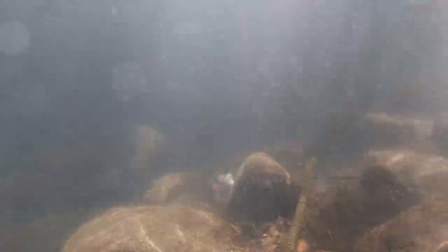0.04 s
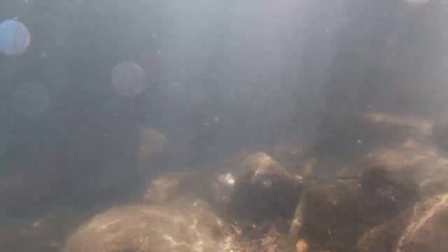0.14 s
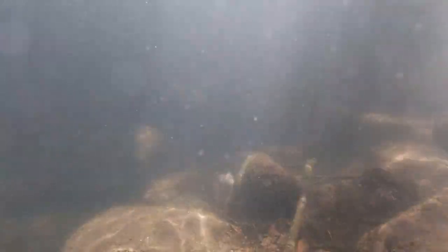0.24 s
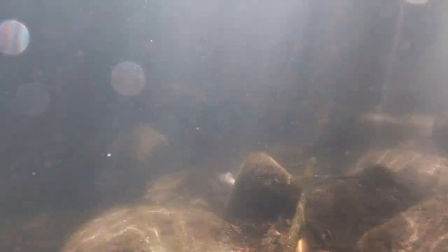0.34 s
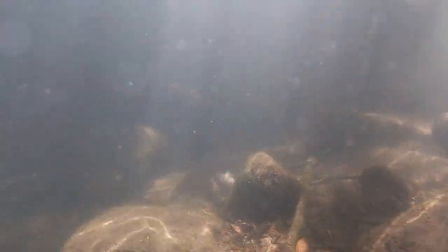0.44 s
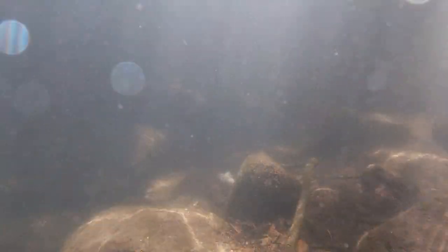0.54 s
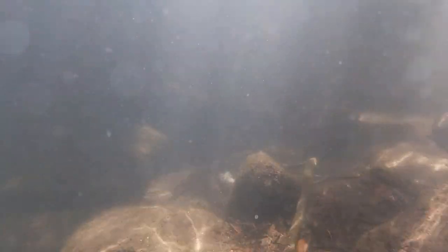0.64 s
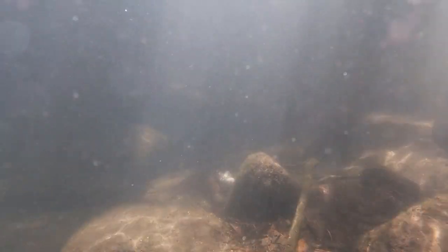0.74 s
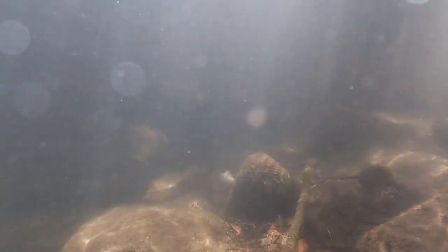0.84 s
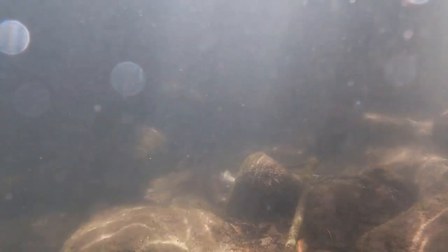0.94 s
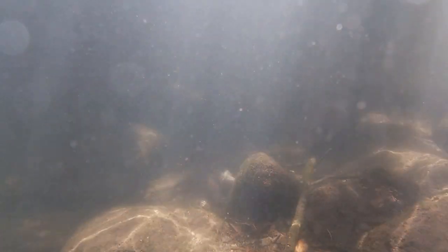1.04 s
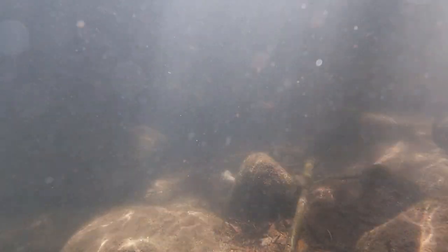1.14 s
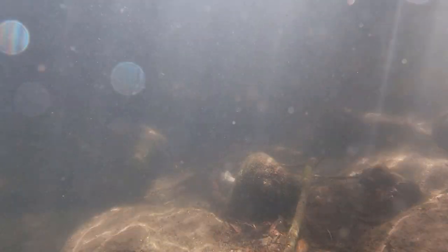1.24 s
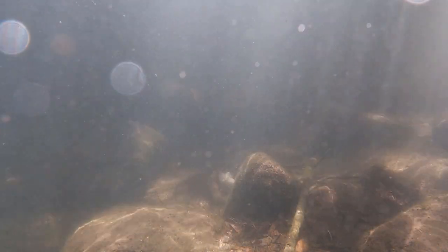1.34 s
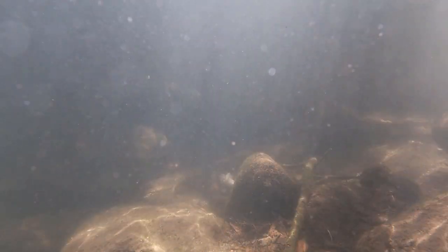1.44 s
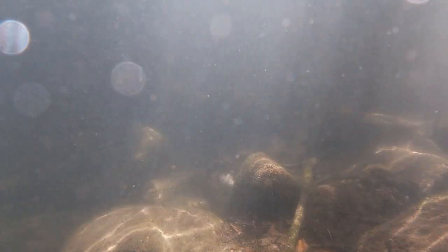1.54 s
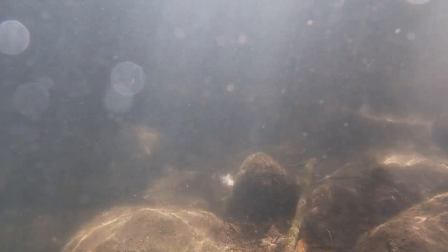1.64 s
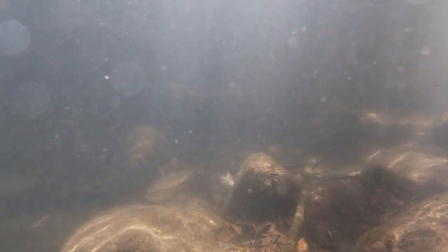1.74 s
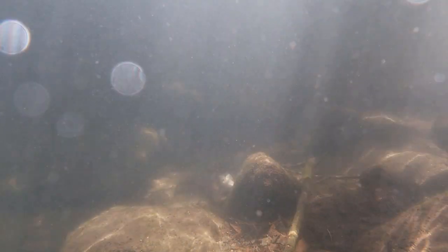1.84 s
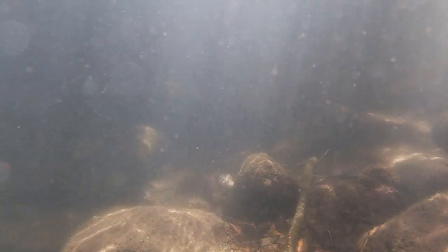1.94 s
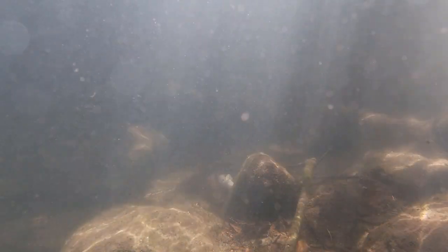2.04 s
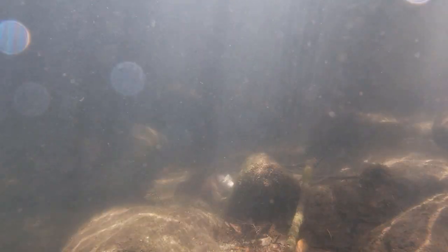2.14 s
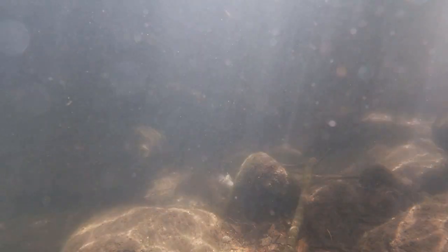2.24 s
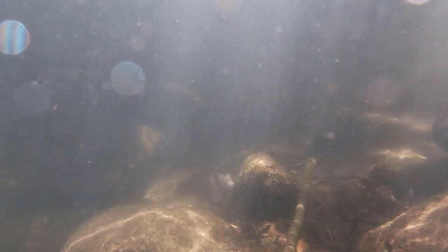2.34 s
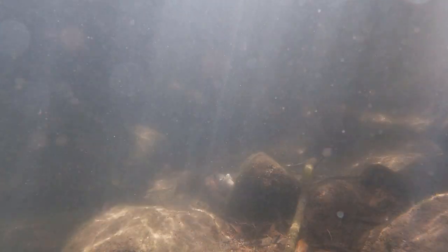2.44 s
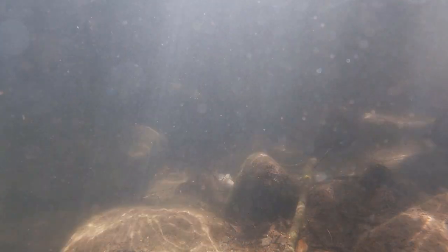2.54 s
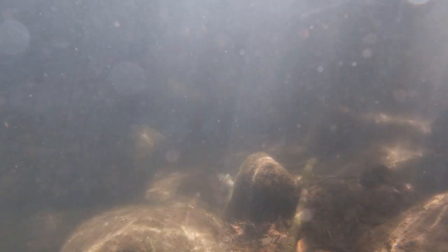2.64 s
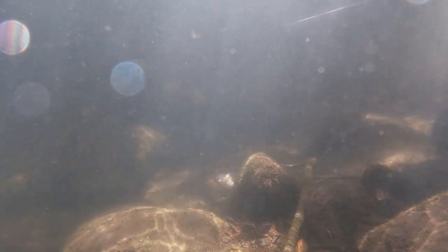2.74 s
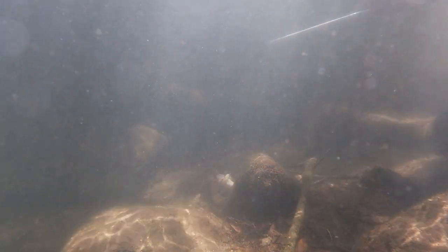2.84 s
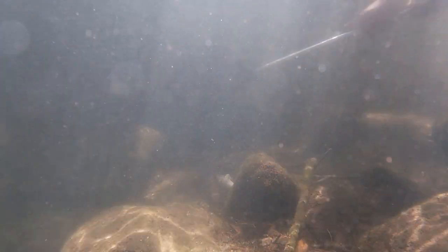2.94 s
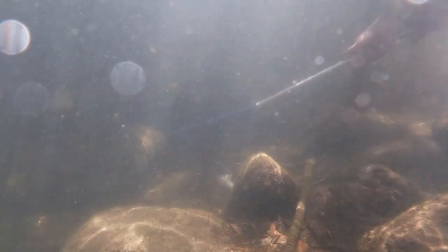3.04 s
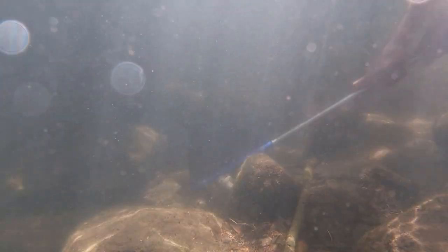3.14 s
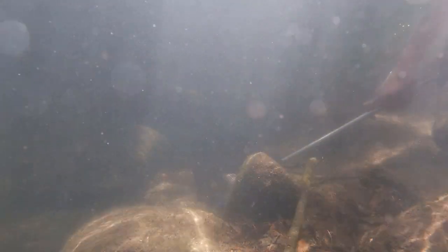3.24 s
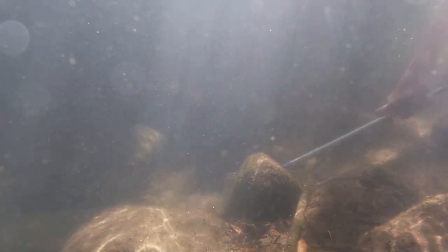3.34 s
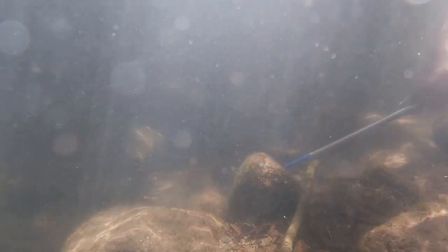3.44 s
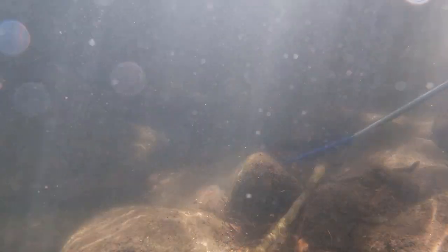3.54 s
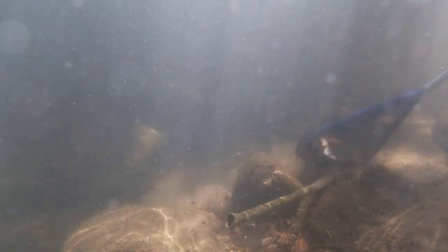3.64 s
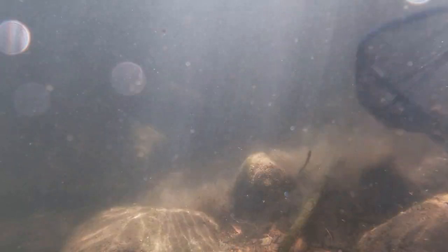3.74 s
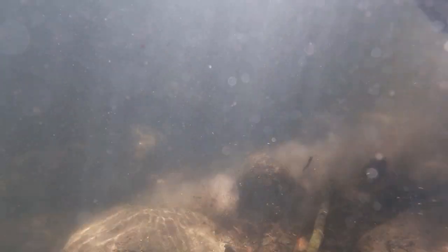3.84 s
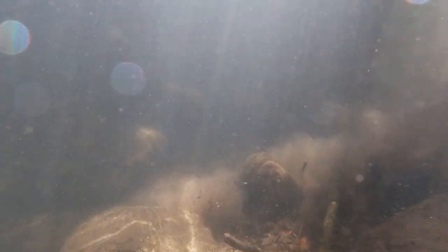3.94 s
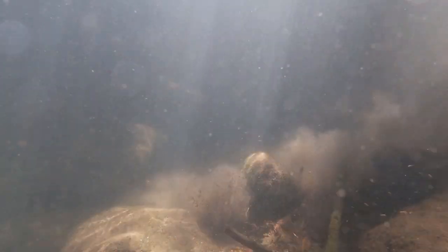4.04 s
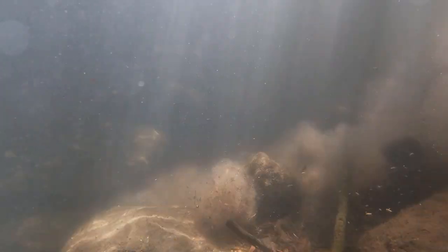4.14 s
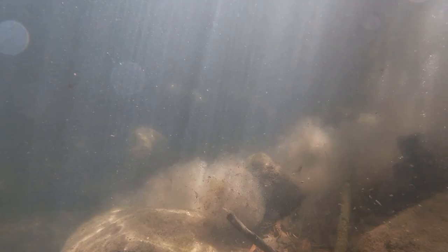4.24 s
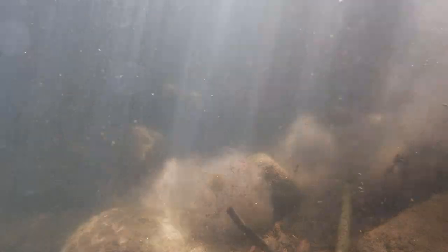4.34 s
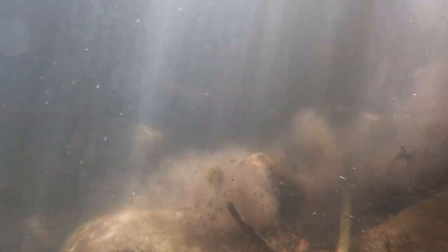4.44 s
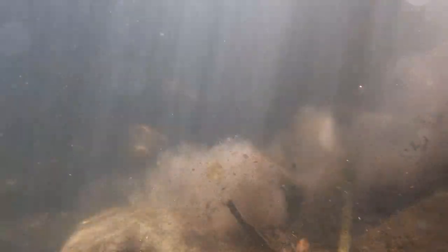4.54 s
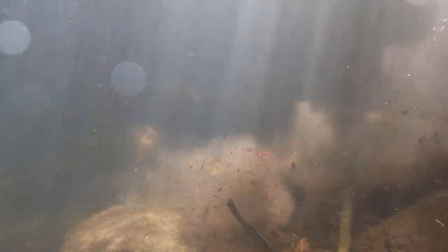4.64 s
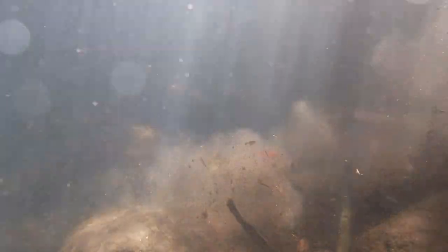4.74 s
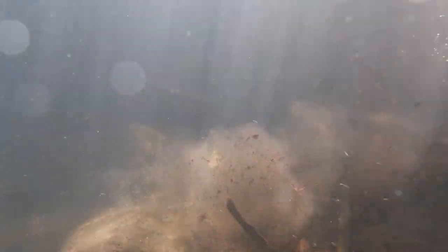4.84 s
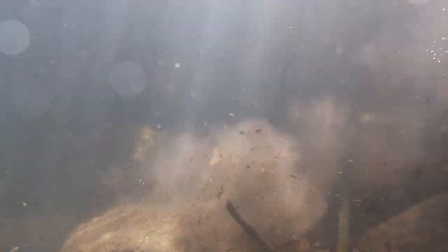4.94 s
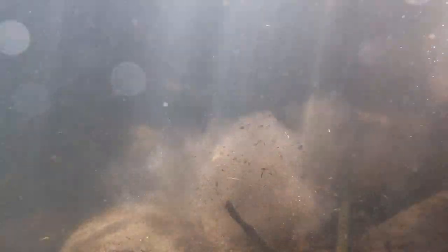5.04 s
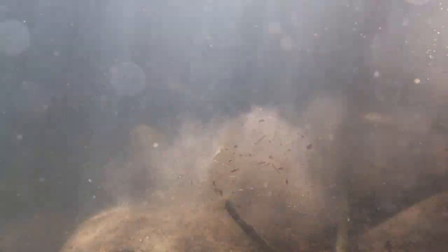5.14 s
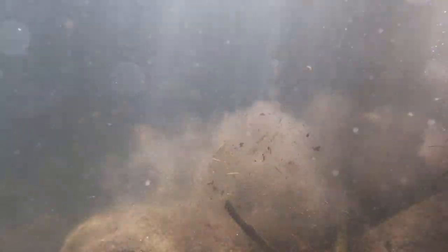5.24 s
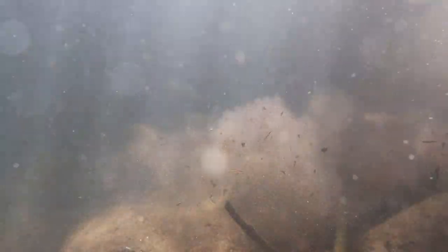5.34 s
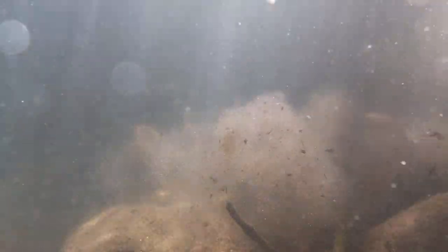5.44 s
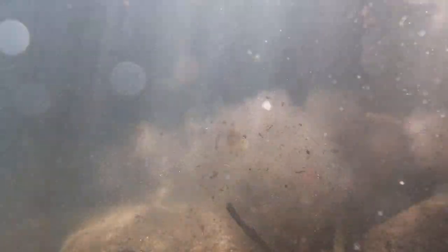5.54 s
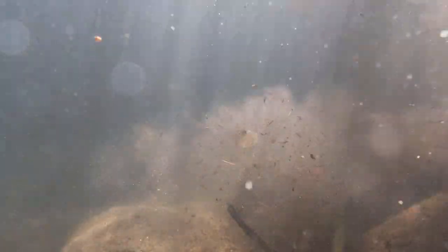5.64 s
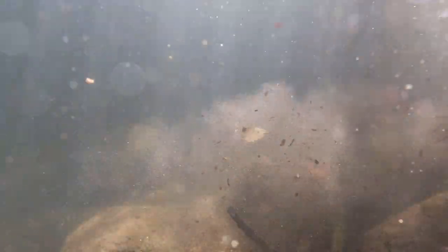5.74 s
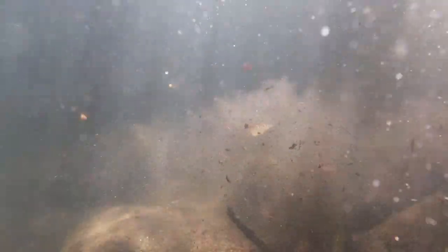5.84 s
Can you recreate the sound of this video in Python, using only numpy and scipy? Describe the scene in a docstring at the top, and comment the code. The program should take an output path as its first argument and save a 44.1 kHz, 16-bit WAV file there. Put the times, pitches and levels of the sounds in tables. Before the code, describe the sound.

Heard from a camera in a sealed housing on a shallow creek bed: a very quiet, hollow murmur with a few faint bloops. Around three seconds a hand net dips in, bringing bubbling, a growing muffled rush and splashes. Hard knocks and crackling spray peak near four and a half seconds, followed by fat, wobbling air gulps that rise in pitch, then a few weak drips and near silence.

```python
"""The bed of a shallow creek, heard inside a waterproof housing: the stream murmurs through the case (bubbles, noise).
A hand net dips in and sweeps past: bubble swarms and noise wash, splash and fizz; bubbles ring as decaying sines,
spits crack, slaps knock the housing. It drags down a big pocket of air, a wobbling tone that gulps,
then rises in pitch as it shrinks; a few last drops fall."""
import sys
import numpy as np
from scipy import signal
from scipy.fft import rfft, irfft, next_fast_len
from scipy.io import wavfile
from scipy.ndimage import uniform_filter1d

SR = 44100
rng = np.random.default_rng(int(sys.argv[2]) if len(sys.argv) > 2 else 0)


def materialize(psi):
    """Save the field psi as 16-bit PCM at rate SR to the path in sys.argv[1].

    A 1-D psi becomes a single channel; in a 2-D psi each row is a channel.
    """
    bounded = np.clip(np.atleast_2d(psi).T, -1, 1)
    quanta = np.round(bounded * 32767).astype(np.int16)
    wavfile.write(sys.argv[1], SR, quanta)


N = 259308
TIME = np.arange(N) / SR
TOP_HZ = 15700

# response of the housing: f/Hz, gain/dB
HOUSING_RESPONSE = [(150, -10.5), (300, -7.5), (420, 9.5), (770, 8), (845, -6), (1050, -11.5), (1340, -5),
                    (1600, -23), (1800, -36), (2080, -24), (3000, -35), (3350, -42), (4000, -39.5),
                    (4800, -50.5), (9000, -60.5), (13000, -79.5)]


def undb(db):
    """Decibels to gain."""
    return 10 ** (np.asarray(db) / 20)


def unit(x):
    """Scale to an rms of 1."""
    return x / np.sqrt(np.mean(x ** 2))


def add(track, at_s, sound):
    """Mix a sound into the track at a time."""
    start = int(at_s * SR)
    track[start:start + len(sound)] += sound[:N - start]


def curves(table):
    """Each column of a table, interpolated linearly over time."""
    t_s, *columns = np.transpose(table)
    return [np.interp(TIME, t_s, column) for column in columns]


def colour(x, points):
    """Minimum-phase filter with a (Hz, dB) response: hits ring only after their onset."""
    hz, db = np.transpose(points)
    size = next_fast_len(2 * len(x))
    size += size % 2
    bin_hz = np.arange(size // 2 + 1) * SR / size
    gain_db = np.interp(np.log(bin_hz + 1), np.log(hz), db)
    # fold the cepstrum onto positive time to make the response causal
    cepstrum = irfft(np.log(undb(gain_db)))
    cepstrum[1:size // 2] *= 2
    cepstrum[size // 2 + 1:] = 0
    response = np.exp(rfft(cepstrum))
    return irfft(rfft(x, size) * response)[:len(x)]


def band(x, hz, kind, order=4):
    """Butterworth filter."""
    return signal.sosfilt(signal.butter(order, hz, kind, fs=SR, output="sos"), x)


def walk(rate_hz):
    """Smoothed random steps with a spread near 1."""
    k = int(SR / rate_hz)
    steps = np.repeat(rng.standard_normal(N // k + 1), k)
    return 1.2 * uniform_filter1d(steps, k)[:N]


def ring(hz, life_s, rise_octaves_per_s, onset_cycles):
    """A bubble: a sine that swells over its first cycles, then dies away while its pitch glides."""
    hold = 1.43  # above 1: the level holds briefly before it dies
    t = np.arange(int(life_s * SR) + 2) / SR
    cycles = np.cumsum(hz * 2 ** (rise_octaves_per_s * t)) / SR
    fade_db = -20 * (3 * t / life_s) ** hold  # -20 dB at a third of the life
    swell = 1 - np.exp(-(cycles / onset_cycles) ** 2)
    return np.sin(2 * np.pi * cycles) * undb(fade_db) * swell


def swarm(count, low_hz, high_hz, life_cycles, spread_db, onset_cycles=0.6, climb_octaves=0.25):
    """A cloud of bubbles of random size, most weak and a few strong, each rising slightly."""
    out = np.zeros(N)
    for when, size, life, strength in rng.random((count, 4)):
        hz = low_hz * (high_hz / low_hz) ** size
        life_s = life_cycles * (.5 + life) / hz
        db = spread_db * min(-np.log(1 - strength), 4)
        bubble = ring(hz, life_s, climb_octaves / life_s, onset_cycles)
        add(out, when * (N - 1) / SR, undb(db) * hz * bubble)
    return unit(out)


def even(x, window_s):
    """Hold the slow level of a texture at 1 and leave its fine grain alone."""
    power = np.abs(uniform_filter1d(x ** 2, int(window_s * SR)))
    return x / np.sqrt(power + 1e-12)


def stream():
    """Distant riffles: countless bubbles and noise that boom in the housing, over a faint hiss."""
    # spectral shape of the murmur: f/Hz, gain/dB
    murmur_shape = [(90, -49), (150, -16), (210, -16), (300, -25), (430, -10), (540, -1), (740, -8),
                    (860, -23), (1050, -25.5), (1350, -23.5), (1750, -61.5)]
    # spectral shape of the hiss: f/Hz, gain/dB
    hiss_shape = [(100, -4), (2000, -12), (5000, -16), (9000, -28.5), (15000, -38)]
    # background levels: t/s, murmur level/dB, hiss level/dB
    stream_levels = [(0, -51.5, -75), (1.8, -54.5, -74.5), (2.7, -49.5, -72.5), (4.3, -39.5, -76),
                     (4.7, -56.5, -90), (5.88, -57.5, -83)]
    murmur_db, hiss_db = curves(stream_levels)
    riffle = swarm(count=1800, low_hz=290.4, high_hz=1680, life_cycles=64, spread_db=3.0)
    murmur = unit(colour(riffle + 3.5 * rng.standard_normal(N), murmur_shape))
    hiss = unit(colour(rng.standard_normal(N), hiss_shape))
    return murmur * undb(murmur_db + 1.2 * walk(13)) + hiss * undb(hiss_db)


def spits():
    """Droplets burst at the surface: a sharp, wide crack and the ping of the small cavity left behind."""
    # bursts: t/s, ping f/Hz, level/dB, ping t60/s
    spit_table = [(3.742, 2310, -39, 0.032), (3.797, 2200, -30, 0.026), (3.946, 4000, -58.5, .015),
                  (4.186, 3890, -45.5, .02), (4.197, 2120, -30.5, 0.04), (4.209, 3600, -43.5, 0.029),
                  (4.323, 4650, -40.5, .02), (4.349, 5100, -41.5, 0.016), (4.366, 5930, -44, 0.017),
                  (4.43, 2500, -36, 0.03), (4.46, 2600, -29, 0.027), (4.82, 2960, -62.5, 0.012),
                  (4.832, 6500, -63.5, 0.0098), (5.021, 2750, -52, 0.032), (5.806, 2100, -59, 0.039)]
    crack_rms, crack_decay_s = .55, .003  # rms before the decay, beside a ping of 1
    out = np.zeros(N)
    for at_s, hz, db, t60_s in spit_table:
        t = np.arange(int(t60_s * SR)) / SR
        burst = band(rng.standard_normal(len(t)), [1900, min(hz * 1.4, TOP_HZ)], "band", order=4)
        crack = crack_rms * unit(burst) * np.exp(-t / crack_decay_s)
        swell = 1 - np.exp(-hz * t / 2)
        ping = np.sin(2 * np.pi * hz * t) * swell * undb(-60 * t / t60_s)
        add(out, at_s, undb(db) * (crack + ping))
    return out


def slaps():
    """Water knocks the housing: a sharp pressure step and a short spatter, both coloured by the case."""
    # knocks: t/s, peak level/dB, brightness as gain from 2.2 kHz up/dB
    slap_table = [(3.31, -12.5, -26.5), (4.379, -8, 1.5), (4.397, -7, -13.5), (4.454, -7, -11),
                  (4.513, -12, 8.5), (4.999, -25, -6.5)]
    out = np.zeros(N)
    t = np.arange(SR // 10) / SR
    for at_s, db, bright_db in slap_table:
        push = .1 * rng.standard_normal(len(t)) * np.exp(-t / .002)
        push[0] += 1
        knock = colour(push, HOUSING_RESPONSE)
        knock = colour(knock, [(700, 0.0048), (2200, bright_db)])
        add(out, at_s, undb(db) * knock / np.abs(knock).max())
    return out


def bubbles():
    """Near bubbles ring as they pinch off, and set the housing rattling briefly."""
    # single bubbles: t/s, initial f/Hz, level before trim/dB, life/s
    bubble_table = [(.2, 448, -43, 0.25), (.211, 565, -38, 0.11), (0.353, 103, -31.5, 0.061),
                    (.438, 650, -31.5, 0.12), (.474, 110, -41.5, 0.12), (1.552, 495.6, -36.5, 0.23),
                    (1.58, 554, -36.5, 0.18), (2.078, 562, -41, 0.078), (2.43, 120, -37.5, 0.12),
                    (2.899, 710, -26, 0.051), (2.925, 141, -31.5, 0.063), (2.984, 1390, -25, 0.065),
                    (3.039, 690, -25, 0.048), (3.109, 903, -36.5, 0.15), (3.135, 501, -23.5, 0.21),
                    (3.166, 770, -26, 0.14), (3.25, 712, -20.5, 0.058), (3.309, 690, -13, 0.048),
                    (3.317, 594, -21.5, 0.21), (3.4, 580, -14.5, 0.028), (3.447, 557, -13.5, 0.051),
                    (3.448, 157, -32.5, 0.14), (3.46, 546, -13, 0.075), (3.587, 440.4, -27.5, 0.5),
                    (3.626, 435, -18, 0.25), (3.749, 101, -31, 0.11), (3.785, 477.3, -20.5, 0.2),
                    (4.162, 1180, -28.5, 0.052), (4.219, 523, -12.5, 0.1), (4.221, 1274, -21, 0.058),
                    (4.298, 677, -13, 0.084), (4.395, 720, -10.5, 0.045), (4.406, 756, -11.5, 0.041),
                    (4.453, 1096, -13, .03), (4.478, 534, -9.5, 0.12), (4.5115, 446, 1, 0.049),
                    (4.533, 470, -26, 0.13), (4.739, 434, -13.5, 0.25), (4.738, 666, -12.5, 0.041),
                    (4.775, 329.7, -11, 0.17), (4.819, 335, -11.5, 0.11), (4.839, 745, -27.5, 0.078),
                    (4.906, 403.5, -21.5, 0.16), (4.933, 521.3, -23.5, 0.2), (4.999, 719, -31.5, 0.094),
                    (5.183, 517, -30, 0.068), (5.275, 420, -40.5, 0.18), (5.385, 917, -33, 0.11),
                    (5.748, 670, -41, 0.098)]
    trim_db, rattle_db, rattle_decay_s = 0.7, -7.0, 0.043
    rise_octaves = 0.18  # climb over the life: short-lived bubbles chirp fastest
    out = np.zeros(N)
    for at_s, hz, db, life_s in bubble_table:
        bubble = ring(hz, life_s, rise_octaves / life_s, onset_cycles=0.9)
        add(out, at_s, undb(db + trim_db) * bubble)
    t = np.arange(SR // 10) / SR
    rattle = colour(rng.standard_normal(len(t)) * np.exp(-t / rattle_decay_s), HOUSING_RESPONSE)
    rattle /= np.abs(rfft(rattle)).max()
    rattling = undb(rattle_db) * signal.fftconvolve(out, rattle)[:N]
    return band(out + rattling, 1200, "low", order=6)


def air_pocket():
    """A large trapped bubble rings and shoves the case at each gulp; its pitch climbs as it sheds air and rises."""
    # gulps: peak t/s, level/dB, build-up time constant/s
    gulp_table = [(4.567, -14, 0.004), (4.634, -17.5, 0.002), (4.677, -15.5, .025), (4.696, -11, 0.0045),
                  (4.744, -15, 0.0028), (4.82, -9, 0.00094)]
    gulp_decay_db_per_s = 221.5
    held_hz, rise_octaves_per_s = 227.7, 2.5
    freed_s, gone_s, fade_s = 4.79, 5.31, 0.0076  # floats free, reaches the surface
    hum_db = -49  # quiet ringing on the way up
    bend_share, bend_decay_s = 0.0705, .015  # each gulp lifts the pitch, which sags back
    thump_hz, thump_life_s, thump_db = 107, 0.04, -6.5  # shove on the case; level beside the gulp

    hz = held_hz * 2 ** (rise_octaves_per_s * np.maximum(TIME - freed_s, 0))
    envelopes, thumps, bend = [], np.zeros(N), np.zeros(N)
    for at_s, db, build_s in gulp_table:
        build = np.exp(np.minimum(TIME - at_s, 0) / build_s)
        envelopes.append(undb(db - gulp_decay_db_per_s * np.maximum(TIME - at_s, 0)) * build)
        thump = ring(thump_hz, thump_life_s, 0, onset_cycles=.3)
        add(thumps, at_s - 1 / held_hz, undb(db + thump_db) * thump)
        add(bend, at_s, bend_share * np.exp(-TIME / bend_decay_s))
    gulps = np.max(envelopes, axis=0)

    # it wobbles while it is large, and steadies as it shrinks
    wobble = (held_hz / hz) ** 5
    bent_hz = hz * (1 + wobble * (bend + 0.025 * walk(60)))
    throb = np.sqrt(2) * np.sin(2 * np.pi * np.cumsum(bent_hz) / SR)
    # lobes of air tear off and gurgle at pitches of their own
    lobes = even(swarm(count=200, low_hz=310, high_hz=450, life_cycles=45, spread_db=3), .06)
    floating = np.clip(np.minimum(TIME - freed_s, gone_s - TIME) / fade_s, 0, 1)
    hum = undb(hum_db + 4.6 * walk(30)) * floating
    return thumps + (throb + undb(-8.5) * wobble * lobes) * np.hypot(gulps, hum)


def stirring():
    """Gains of wash, splash, fizz and surge: each stir sets in, swells (or sinks) steadily in dB and settles."""
    # stirs, layer levels as reached at the end: start t/s, end t/s, swell/dB,
    # wash level/dB, splash level/dB, fizz level/dB, surge level/dB
    stir_table = [(0.403, 0.454, 14, -36.5, -55, -90, -49), (0.558, 0.71, -4, -51, -66, -95, -66.5),
                  (2.314, 2.484, 7.5, -46.5, -51.5, -68, -57),
                  (2.869, 3.025, 3.5, -39.5, -45, -62.5, -62.5),
                  (3.125, 3.187, -1.5, -34, -48, -62.5, -72.5),
                  (3.248, 3.439, 1, -33.5, -38.5, -57.5, -62.5), (3.474, 3.782, 4, -28, -34.5, -41.5, -39),
                  (3.8, 3.988, -1, -34, -43.5, -58.5, -70), (4.043, 4.152, 1, -41, -60.5, -59.5, -82),
                  (4.195, 4.24, 1.5, -27.5, -42.5, -52.5, -61), (4.302, 4.385, 2.2, -25.5, -29, -39.5, -31),
                  (4.438, 4.461, 1, -21.5, -27.5, -47.5, -25), (4.529, 4.787, 0.5, -33.5, -47, -69, -23),
                  (4.829, 4.95, 0, -37, -52, -72.5, -41.5), (5.01, 5.342, -4, -48.5, -63, -87, -65.5)]
    # multiple of the swell in dB that each layer follows: wash, splash, fizz, surge [1]
    swell_powers = (0.898, 1.201, 2.399, 2.6)
    attack_db_per_s, release_db_per_s = 447.5, 255.5
    power = np.zeros((len(swell_powers), N))
    for start_s, end_s, swell_db, *levels_db in stir_table:
        attack_db = attack_db_per_s * np.minimum(TIME - start_s, 0)
        release_db = release_db_per_s * np.minimum(end_s - TIME, 0)
        edges_db = attack_db + release_db
        heard = edges_db > -80
        to_go = np.clip((end_s - TIME[heard]) / (end_s - start_s), 0, 1)
        for layer, db, steepness in zip(power, levels_db, swell_powers):
            layer[heard] += undb(db + edges_db[heard] - steepness * swell_db * to_go) ** 2
    return np.sqrt(power)


def churn():
    """Stirred water: larger bubbles wash, smaller ones splash and fizz, and the current shoves the case."""
    # merging of spray grains into a smooth rush, as when water strains through the mesh: t/s, share [0-1]
    blur_table = [(3.1, 0.74), (3.5, 0.8), (3.78, 0.9), (3.95, 0.5), (4.2, 0.15), (4.35, 0.5), (4.6, 0)]
    wash_gain, splash_gain, fizz_gain, surge_gain = stirring()
    blur = np.clip(curves(blur_table)[0], .05, 1)
    grain_gain, smooth_gain = np.sqrt(1 - blur), np.sqrt(blur)

    large = swarm(count=2400, low_hz=134.55, high_hz=906.5, life_cycles=79.5, spread_db=3.5)
    small = swarm(count=2600, low_hz=784.4, high_hz=1688, life_cycles=86, spread_db=5.5, onset_cycles=1.0)
    tiny = swarm(count=16000, low_hz=1750, high_hz=9000, life_cycles=48, spread_db=6.5,
                 onset_cycles=3, climb_octaves=.05)
    froth = colour(rng.standard_normal(N) * undb(3.14 * walk(120)), HOUSING_RESPONSE)

    wash = even(colour(large, HOUSING_RESPONSE), 0.063) + 0.35 * unit(band(froth, 840, "low"))
    splash_grains = even(colour(small, HOUSING_RESPONSE), 0.22)
    splash = grain_gain * splash_grains + smooth_gain * unit(band(froth, [880, 1800], "band"))

    # the smooth rush is darker than the separate ticks
    rush = unit(band(band(froth, 1690, "high", order=8), 4700, "low", order=1))
    # spray crackles between the ringing bubbles
    crackle_db = 9.6 * np.clip(walk(260), -2, 2)
    crackle = band(rng.standard_normal(N) * undb(crackle_db), 1800, "high")
    ticks = even(colour(tiny + .55 * unit(crackle), HOUSING_RESPONSE), 0.047)
    fizz = grain_gain * ticks + smooth_gain * undb(-5.0) * rush

    rumble = band(rng.standard_normal(N), 250, "low", order=4)
    surge = even(band(rumble, 160, "high", order=1), 0.15)
    sloshing = undb(-1.0) * wash_gain * wash + splash_gain * splash + surge_gain * surge
    return sloshing * undb(1.7 * walk(55)) + fizz_gain * fizz


def scene():
    """Everything as heard inside the housing."""
    return (stream() + churn() + bubbles() + spits() + slaps() + air_pocket())[None]


def record(dry):
    """Clip at full scale, then cut the treble above TOP_HZ with a steep elliptic low-pass."""
    low_pass = signal.ellip(8, .2, 70, TOP_HZ, fs=SR, output="sos")
    return signal.sosfilt(low_pass, np.clip(dry, -1, 1))


dry = scene()
out = record(dry)
materialize(out)
```